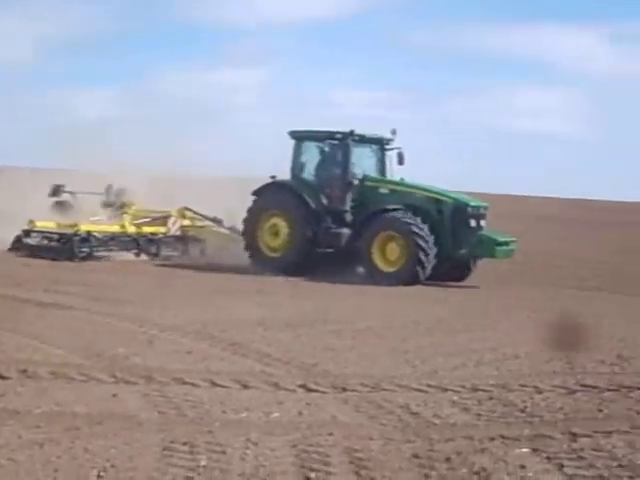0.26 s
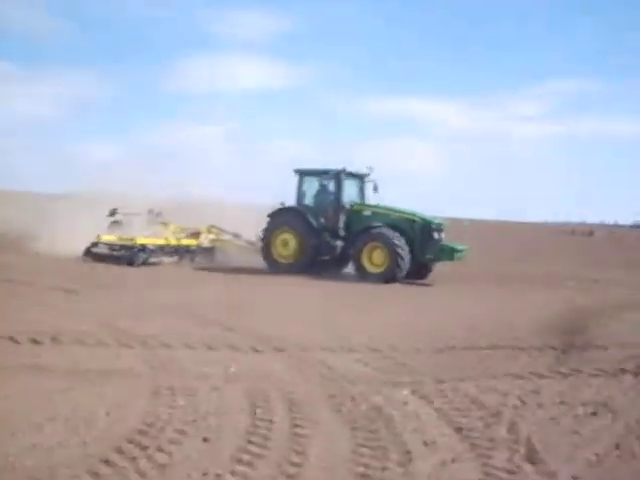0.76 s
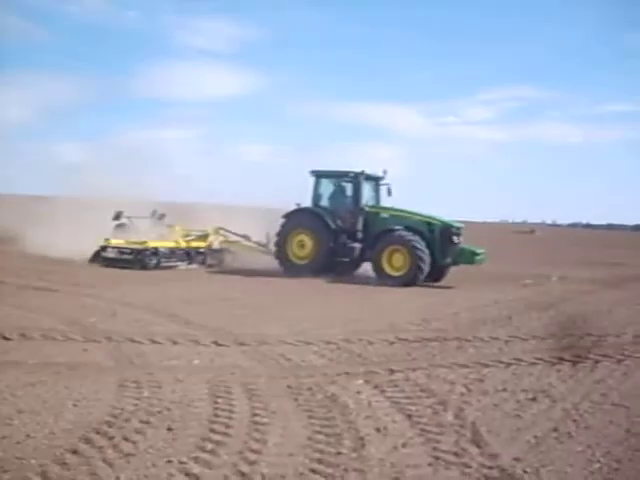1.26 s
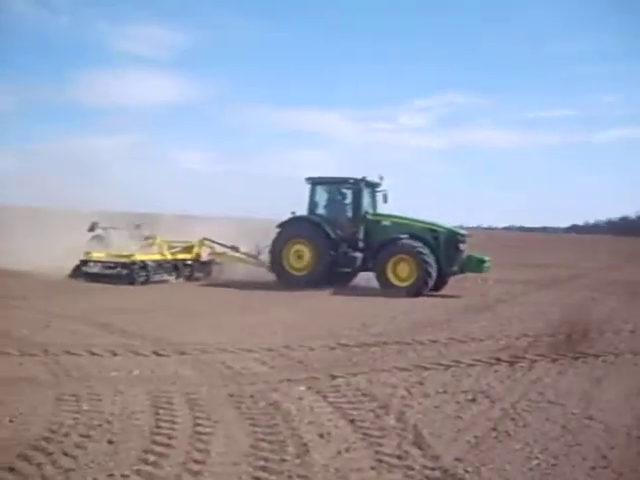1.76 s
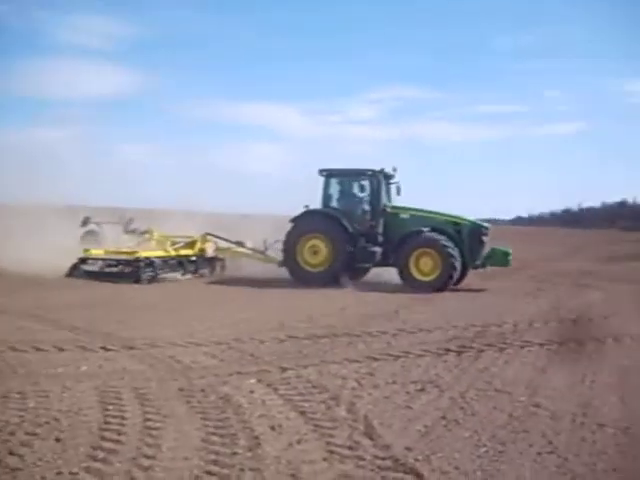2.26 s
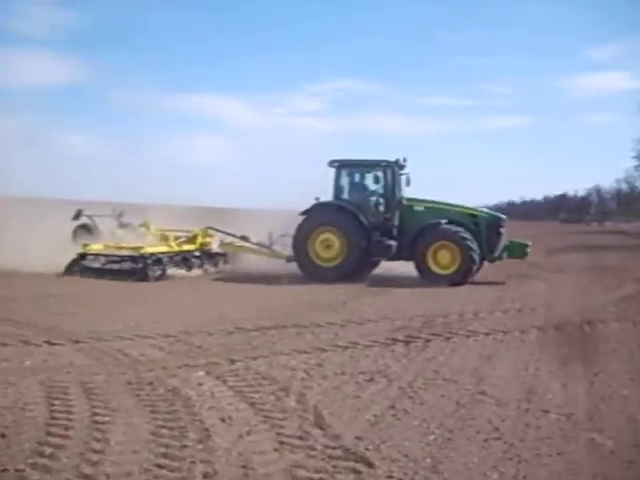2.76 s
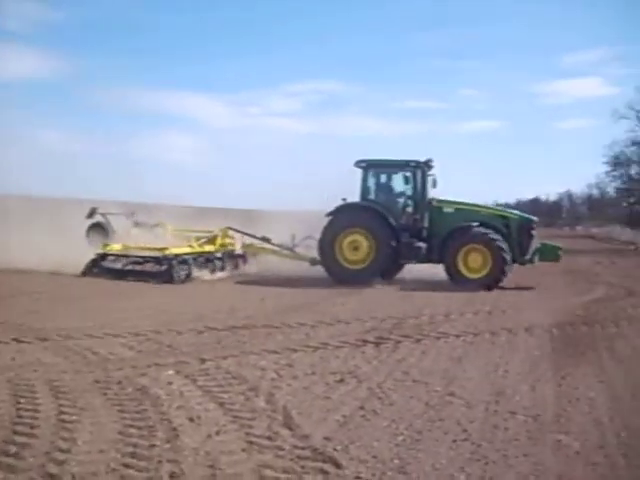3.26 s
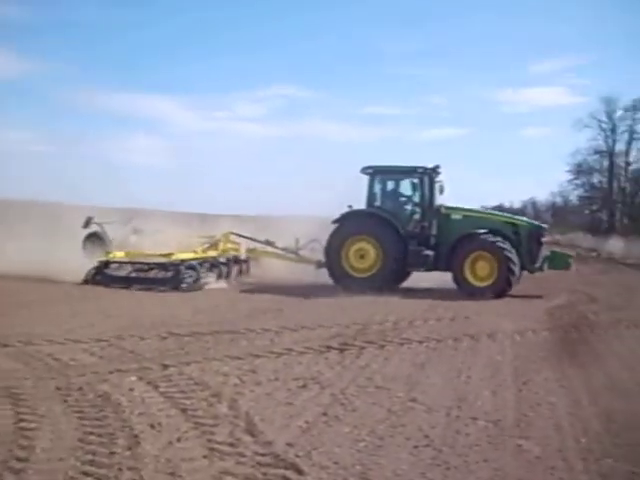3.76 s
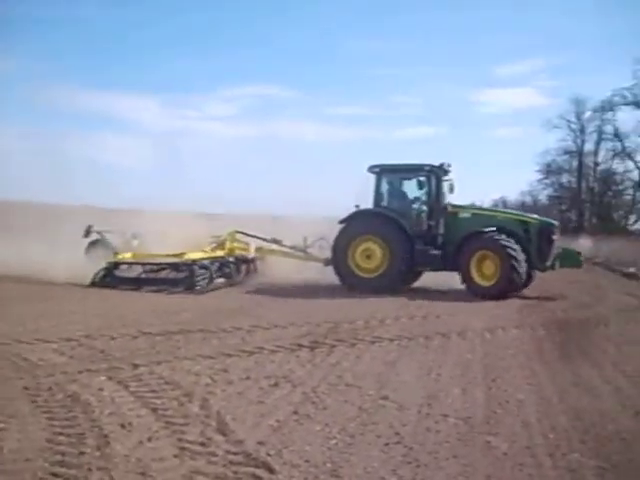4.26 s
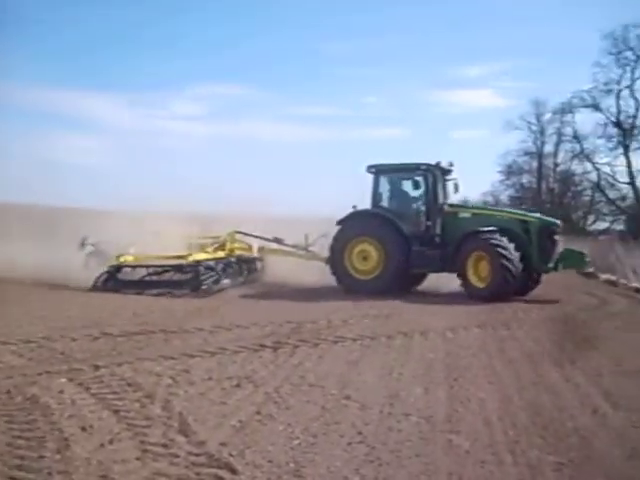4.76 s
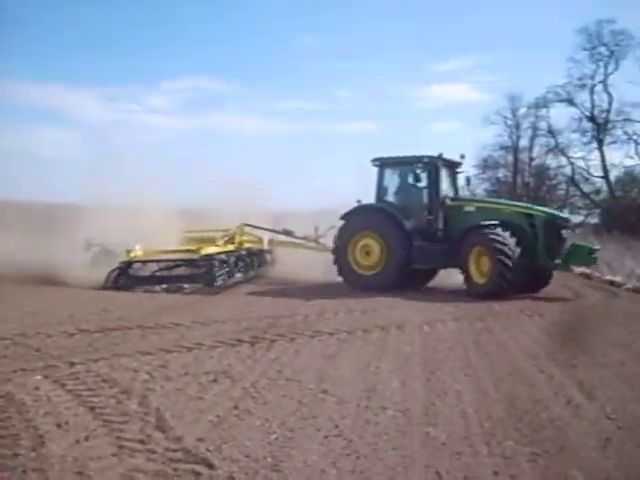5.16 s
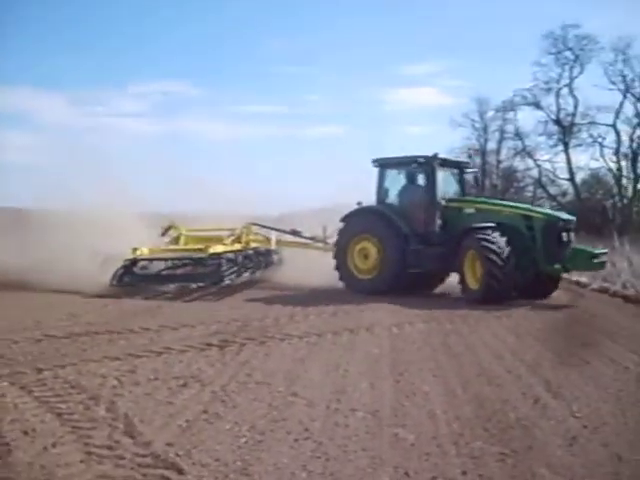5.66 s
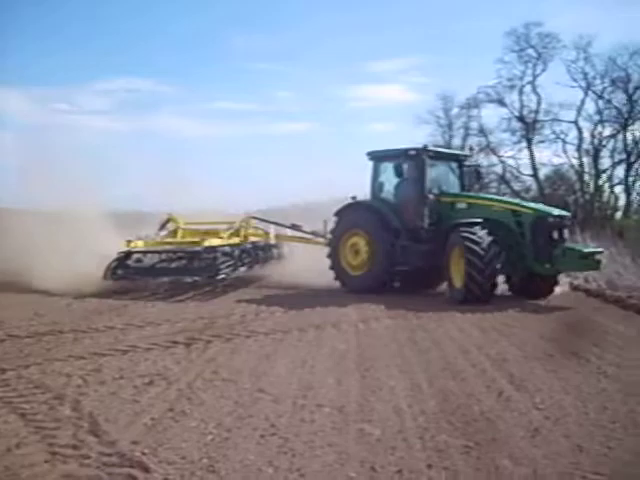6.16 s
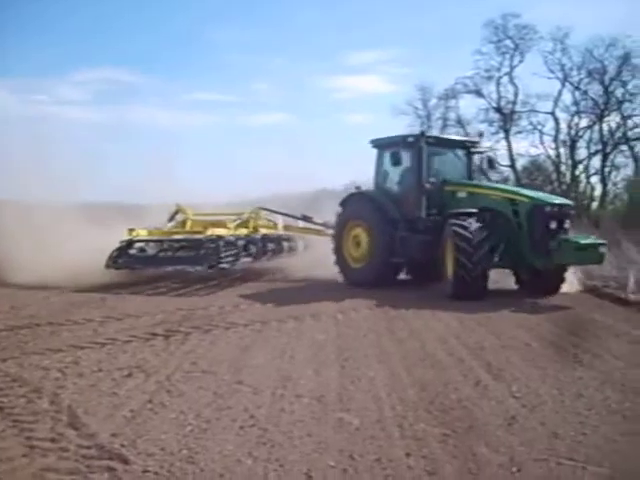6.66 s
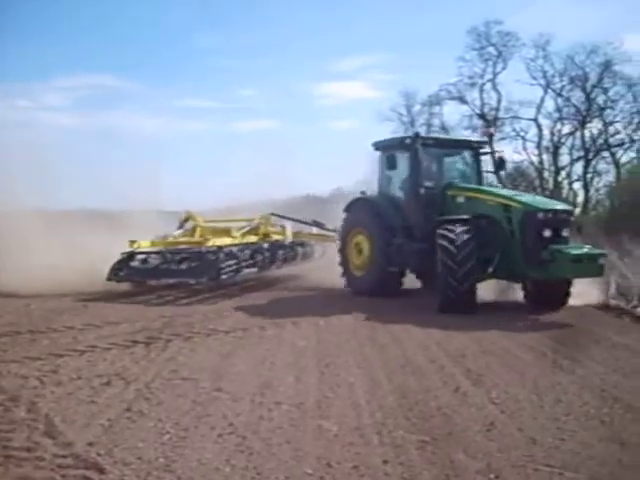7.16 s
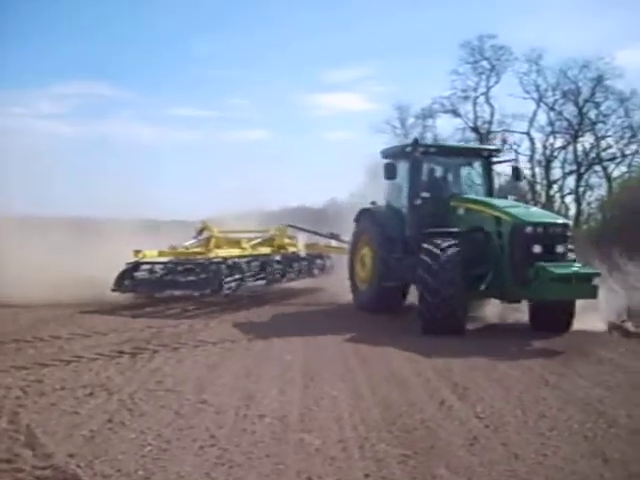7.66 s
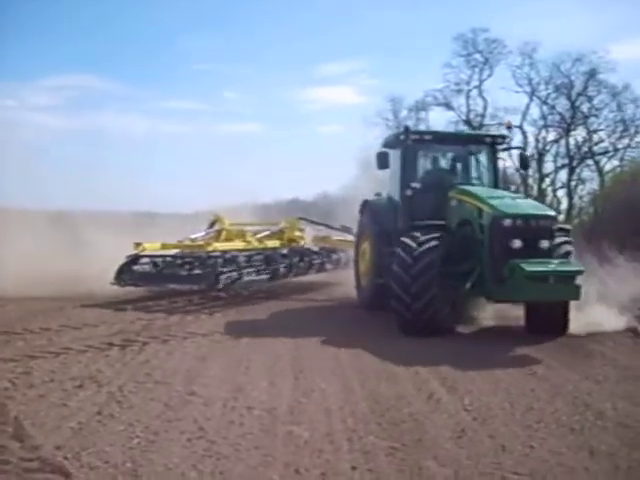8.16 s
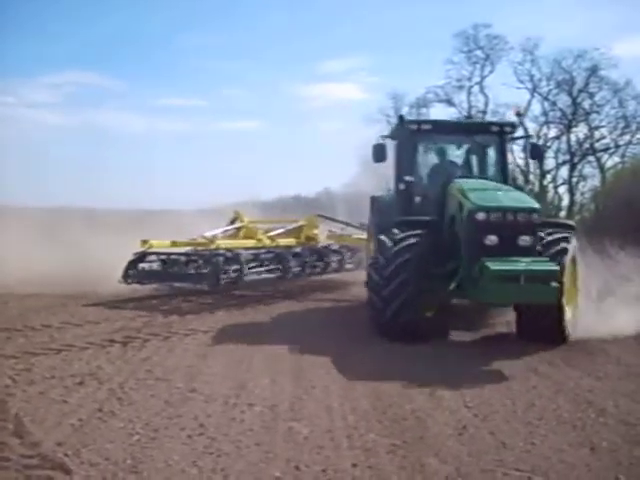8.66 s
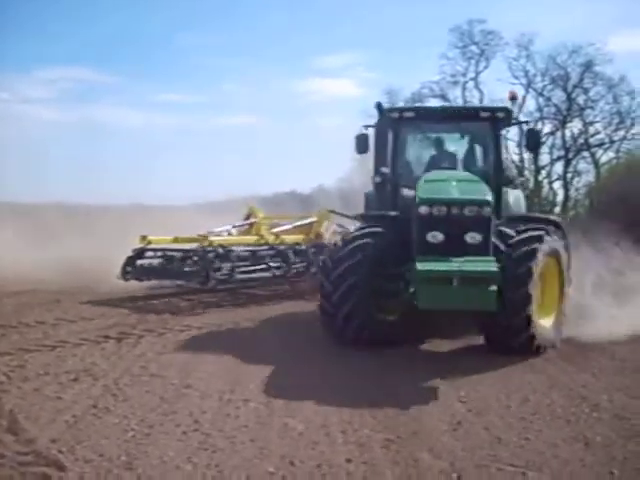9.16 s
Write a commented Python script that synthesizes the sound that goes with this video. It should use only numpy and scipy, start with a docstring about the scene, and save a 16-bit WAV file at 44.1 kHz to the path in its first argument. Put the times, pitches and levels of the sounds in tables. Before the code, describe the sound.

A tractor's clattering diesel drops from high revs to a low, approaching hum, with faint whines, metallic ticks and three sudden silences.

```python
"""A six-cylinder diesel tractor roars and clatters as it drags a cultivator over a dry field, eases off
and comes nearer. Each firing is an impulse that excites pipe, block and injectors; their noise follows
speed, load and distance, and the periodic firing gives the exhaust its harmonic note. The cooling fan
hums on a variable drive, gears and turbocharger whistle, discs sing in the soil and stones tick on the
tines over a faint breeze. The sound cuts out three times."""
import sys
import numpy as np
from scipy import signal
from scipy.fft import rfft, irfft, next_fast_len
from scipy.io import wavfile

SR = 44100
rng = np.random.default_rng(int(sys.argv[2]) if len(sys.argv) > 2 else 0)


def transcribe(signal):
    """Save signal, clipped to [-1, 1], as a 16-bit WAV file at the path in sys.argv[1]."""
    frames = np.atleast_2d(signal).T
    limited = np.clip(frames, -1, 1)
    pcm = np.round(limited * 32767).astype(np.int16)
    wavfile.write(sys.argv[1], SR, pcm)


N = 414099
TIME = np.arange(N) / SR

# spectra of the engine's five noise sources: frequency_hz, relative_level_db
PIPE_SPECTRUM = [(20, -23.5), (60, -18.5), (110, -8.5), (170, 3.5), (270, 0), (340, -4), (400, -8),
                 (520, -14), (800, -36)]
BAY_SPECTRUM = [(300, -32), (440, -12), (520, -6), (600, -1.5), (720, 1), (850, 1), (950, -1), (1050, -10),
                (1400, -32.5)]
BLOCK_SPECTRUM = [(700, -34.5), (1000, -6), (1150, -4), (1300, -3), (1480, 0), (1720, -4.5), (1920, -7.5),
                  (2250, -6), (2430, -8.5), (2660, -21.5), (2880, -12.5), (3150, -19.5), (4000, -28.5)]
INJECTOR_SPECTRUM = [(2600, -26.5), (3200, -12), (3500, -1.5), (4300, 3), (4700, 2), (5150, 1.5),
                     (5500, -4.5), (5950, -3.5), (6350, -9), (7100, -8), (8100, -9.5), (9200, -13.5),
                     (10200, -23), (11800, -39)]
GRILLE_SPECTRUM = [(1000, -22.5), (1270, -3), (1500, -3), (1740, -4), (2000, -25)]
# level laws: base_db, speed_doubling_db, full_load_db, distance_halving_db
PIPE_LAW, BAY_LAW, BLOCK_LAW = (-46, 2, 2.5, 7.5), (-38.5, 10.5, -.3, 6), (-38.5, 7.5, 2.5, 4.5)
INJECTOR_LAW, GRILLE_LAW = (-46, 5, 8, 6), (-44.5, 4, 1, 7.5)

def diesel(cycles):
    """Source and filter: one firing rhythm sounds through pipe, engine bay, block, injectors and grille."""
    rumble = firings(cycles, PIPE_SPECTRUM, PIPE_LAW, knock=.1, burst=.2, decay_s=.0098, uneven_db=2)
    roar = firings(cycles, BAY_SPECTRUM, BAY_LAW, knock=.18, burst=.12, decay_s=.01, uneven_db=-1.3)
    clatter = firings(cycles, BLOCK_SPECTRUM, BLOCK_LAW,
                      knock=.14, burst=.083, decay_s=.01, uneven_db=-.3)
    hiss = firings(cycles, INJECTOR_SPECTRUM, INJECTOR_LAW,
                   knock=.05, burst=.15, decay_s=.004, uneven_db=2.4)
    rattle = firings(cycles, GRILLE_SPECTRUM, GRILLE_LAW,
                     knock=.44, burst=.12, decay_s=.0072, uneven_db=.7)
    return rumble + roar + clatter + rattle + hiss


def firings(cycles, spectrum, law, knock, burst, decay_s, uneven_db, cylinders=6):
    """Impulse response: each cylinder rings in its own way and adds a burst to steady flow noise."""
    instants = np.flatnonzero(np.diff(np.floor(cycles)) > 0)
    age = np.arange(SR // 40) / SR
    decay = np.exp(-age / decay_s)
    knocks, bursts = np.zeros(N), np.zeros(N)
    for cylinder in range(cylinders):
        own, impulses = instants[cylinder::cylinders], np.zeros(N)
        imbalance = np.cos(2 * np.pi * cylinder / cylinders) + rng.standard_normal(len(own))
        impulses[own] = from_db(uneven_db * imbalance)
        knocks += signal.oaconvolve(impulses, decay * rng.standard_normal(len(age)))[:N]
        bursts += signal.oaconvolve(impulses, decay)[:N]
    flow = rng.standard_normal(N) * (1 - burst + burst * unit_rms(bursts))
    # knock is the share of the power that rings
    mix = np.sqrt(knock) * coloured(knocks, spectrum) + np.sqrt(1 - knock) * coloured(flow, spectrum)
    return from_db(level_db(law)) * mix


# exhaust orders: firing_multiple (rounded to the nearest half when played), level_law, flutter_db
EXHAUST_ORDERS = [(1 / 2, (-55, 14.5, -12, -3.5), 2.4), (0.92, (-54, -20, 15.5, 3.5), 0.45),
                  (3 / 2, (-60.5, 35, 1.5, 3), .4), (2, (-55.5, 18, 4, 3), 1.8), (2.4, (-69, -27.5, 14, 7),
                  2.9), (7 / 2, (-66, -9.5, 15, 13), 1.8), (4, (-72, -13, 11.5, 15.5), 1.6),
                  (8, (-48, 6.5, -12, 1.5), 6)]
# strength of the twelfth order: time_s, level_db
GROWL_LEVEL = [(2.95, -52), (3.5, -39), (3.8, -53), (5.4, -53.5), (5.9, -37), (6.5, -52), (7.2, -38),
               (7.7, -50), (9.39, -59)]

def exhaust_note(cycles):
    """Harmonic series: whole and half orders of the firing rate; phase jitter makes the twelfth growl."""
    note = sum(tone(np.round(2 * multiple) / 2 * cycles, level_db(law), flutter_db, flutter_hz=5)
               for multiple, law, flutter_db in EXHAUST_ORDERS)
    growl = tone(12 * cycles + .11 * drift(12), curve(GROWL_LEVEL), flutter_db=4, flutter_hz=16)
    return note + growl


DRONE_LAW = (-54, 19, -5, 9)
# strength of the faster gear mesh: time_s, level_db
WHINE_LEVEL = [(2.9, -69), (3.4, -48), (3.92, -54), (4.05, -40.5), (4.45, -45.5), (4.85, -48), (5.3, -44),
               (5.75, -49), (6.2, -42.5), (6.5, -70), (9.39, -61)]

def gear_whine(cycles):
    """Mesh frequency: meeting teeth make a low drone and a high whine, both rough and wavering."""
    slow, fast = 25 / 3, 100 / 3  # 25 and 100 teeth per crank turn, which is three firings
    drone_db = level_db(DRONE_LAW) + panel_db(slow * firing_hz())
    drone = tone(slow * cycles + .14 * drift(12), drone_db, flutter_db=1.4, flutter_hz=12)
    whine = tone(fast * cycles + .15 * drift(14), curve(WHINE_LEVEL), flutter_db=2.9, flutter_hz=18)
    return drone + whine


def panel_db(pitch_hz, resonance_hz=827, width_hz=82, boost_db=10):
    """Resonance: a body panel lifts a tone that sweeps across its natural frequency."""
    detuning = 2 * (pitch_hz - resonance_hz) / width_hz
    return boost_db / np.sqrt(1 + detuning ** 2)


# the fan's variable drive, geared up at low engine speed: time_s, blade_passes_per_firing
FAN_RATIO = [(3.1, 1.5197), (4.85, 2.06), (5.65, 2.36), (6.55, 2.36), (6.95, 2.3), (8.45, 2.275),
             (8.95, 2.2)]

def fan(full_strength_hz=165):
    """Blade-passing tone: a hum with a weak octave; at high revs it beats with an exhaust order."""
    ratio = curve(FAN_RATIO)
    geared_up = (ratio - ratio.min()) / np.ptp(ratio)
    blade_hz = firing_hz() * ratio
    cycles = np.cumsum(blade_hz) / SR
    octaves_below = np.maximum(np.log2(full_strength_hz / blade_hz), 0)
    hum = tone(cycles, -34.5 - 39 * octaves_below + 3 * geared_up, flutter_db=.5, flutter_hz=7)
    octave = tone(2 * cycles, -57 + 8.5 * geared_up, flutter_db=1.1, flutter_hz=8.7)
    return from_db(.5 * distance_halvings()) * (hum + octave)


TURBO_LAW = (-62.5, -2, 3.5, 1)
# the turbocharger's whistle: time_s, pitch_hz
TURBO_PITCH = [(2.2, 11040), (3.3, 7950), (3.8, 7140), (5.4, 8530), (6.3, 7760), (7.15, 8100), (7.7, 7150),
               (8.2, 6900), (9.0, 7760)]

def turbo(waver_hz=24.6, dull_above_hz=8800, loss_db_per_octave=39):
    """Rotor tone: a thin, wavering whistle follows shaft speed and is faint at its highest pitches."""
    pitch_hz = curve(TURBO_PITCH)
    cycles = np.cumsum(pitch_hz + waver_hz * drift(9)) / SR
    loss_db = loss_db_per_octave * np.maximum(np.log2(pitch_hz / dull_above_hz), 0)
    core = narrow_noise(cycles, width_hz=30)
    halo = from_db(-3.5) * narrow_noise(cycles, width_hz=200)
    return from_db(level_db(TURBO_LAW) + 3 * drift(7) - loss_db) * (core + halo)


# stones striking the tines: time_s, impulse_db
STONE_HITS = [(2.141, -20), (2.373, -20), (2.6748, -20), (3.5942, -24), (5.1724, -21), (6.2744, -17),
              (6.541, -19), (7.808, -19), (8.1392, -16), (8.373, -16), (9.208, -14), (9.3402, -15)]

def stones(grit_per_s=20, grit_db=-41.5, decay_s=.0009, steel_band_hz=(3200, 7200)):
    """Impact noise: brief contacts of stones and grit with the steel tines give bright ticks."""
    hits = (rng.random(N) < grit_per_s / SR) * from_db(grit_db + 3 * rng.standard_normal(N))
    for time_s, impulse_db in STONE_HITS:
        hits[int(time_s * SR)] += from_db(impulse_db)
    age = np.arange(SR // 50) / SR
    crack = rng.standard_normal(len(age)) * np.exp(-age / decay_s)
    steel = signal.butter(2, steel_band_hz, "band", fs=SR, output="sos")
    return signal.sosfilt(steel, signal.oaconvolve(hits, crack)[:N])


# steel discs singing in the soil: start_s, end_s, pitch_hz, level_db
DISC_TONES = [(0, .5, 5700, -44), (0, 2.4, 5120, -45), (0, 2.2, 2100, -43), (0, 2.0, 2570, -50),
              (4.0, 5, 5400, -50.5), (5.45, 6.06, 4300, -43), (8.65, 9.2, 5240, -46)]
# squeaks and clinks of the joints: centre_s, pitch_hz, length_s, level_db
JOINT_SQUEAKS = [(2.661, 7380, .06, -48), (2.675, 3200, 0.013, -42), (2.825, 6100, 0.036, -37.5),
                 (2.862, 9300, .035, -44)]

def cultivator(fade_s=.22):
    """Friction-excited vibration: discs sing as the soil rubs them, and dry joints squeak and clink."""
    out = np.zeros(N)
    for start_s, end_s, pitch_hz, db in DISC_TONES:
        rubbing = np.clip(np.minimum(TIME - start_s, end_s - TIME) / fade_s + .5, 0, 1)
        out += from_db(db) * rubbing * narrow_noise(pitch_hz * TIME, width_hz=95)
    for centre_s, pitch_hz, length_s, db in JOINT_SQUEAKS:
        out += from_db(db) * swell(centre_s, length_s) * narrow_noise(pitch_hz * TIME, width_hz=410)
    return out


# puffs of air on the microphone: centre_s, length_s, level_db
WIND_PUFFS = [(8.029, 0.044, -35), (8.449, .06, -35)]

def wind(breeze_db=-59.5):
    """Turbulent pressure: air on the microphone makes a faint rumble and soft low thumps."""
    breeze = from_db(breeze_db + 2.5 * drift(2))
    puffs = sum(from_db(db) * swell(centre_s, length_s) for centre_s, length_s, db in WIND_PUFFS)
    turbulence = coloured(rng.standard_normal(N), [(20, -.5), (50, -4.5), (90, 5), (200, -34)])
    return (breeze + puffs) * turbulence


# engine speed: time_s, firing_rate_hz
ENGINE_SPEED = [(0.0, 107.9), (2.2, 108.6), (2.55, 96.5), (2.9, 85.0), (3.2, 74.1), (3.45, 67.1),
                (3.75, 73.7), (4.05, 65.3), (4.2, 65.0), (4.75, 68.8), (5.15, 70.6), (5.32, 72.8),
                (5.5, 73.3), (5.75, 72.1), (6.15, 68.4), (6.95, 71.7), (7.25, 75.5), (7.6, 70.2),
                (8.0, 68.4), (8.95, 76.1), (9.39, 76.3)]

def firing_hz():
    """Firing frequency: the rate to which the engine's orders are locked."""
    return curve(ENGINE_SPEED)


# how hard the engine pulls: time_s, load_fraction
ENGINE_LOAD = [(0, 0.9), (1.5, 0.61), (2.2, 0.83), (3.05, 0.14), (3.55, 0.6), (3.9, 0.35), (4.3, 0.9),
               (5.15, 0.76), (5.6, 0.32), (6.4, 0.32), (7.0, 0.43), (7.5, 0.07), (7.9, 0.17), (8.45, 0.61),
               (9.05, .55), (9.39, 0.13)]

def level_db(law, cruise_hz=72):
    """Gains add in decibels: a base level plus terms for speed, load and nearness."""
    base_db, speed_db, load_db, near_db = law
    octaves = np.log2(firing_hz() / cruise_hz)
    return base_db + speed_db * octaves + load_db * curve(ENGINE_LOAD) + near_db * distance_halvings()


# the tractor's approach: time_s, distance_m
TRACTOR_PATH = [(0, 38.7), (2.3, 37.3), (4.0, 33.9), (5.2, 25.1), (6.5, 17.8), (7.3, 15.4), (8.0, 15.2),
                (9.39, 12.1)]

def distance_halvings(reference_m=30):
    """Geometric spreading: level changes by a set step each time the distance halves."""
    return np.log2(reference_m / curve(TRACTOR_PATH))


def tone(cycles, db, flutter_db, flutter_hz):
    """Amplitude modulation: a partial of the given rms level flutters in the moving air."""
    return np.sqrt(2) * np.sin(2 * np.pi * cycles) * from_db(db + flutter_db * drift(flutter_hz))


def narrow_noise(cycles, width_hz):
    """Random quadrature modulation spreads a pitch into a narrow band of noise; rms 1."""
    return drift(width_hz) * np.cos(2 * np.pi * cycles) + drift(width_hz) * np.sin(2 * np.pi * cycles)


def coloured(x, spectrum):
    """Linear filtering gives a flat signal the spectrum of a body; rms 1."""
    size = next_fast_len(N)
    hz, db = np.transpose(spectrum)
    bins_hz = np.maximum(np.fft.rfftfreq(size, 1 / SR), 1)
    gain = from_db(np.interp(np.log(bins_hz), np.log(hz), db, left=-90, right=-90))
    return unit_rms(irfft(rfft(x, size) * gain, size)[:N])


def drift(rate_hz):
    """Low-passed noise wanders with a spread of 1, about rate_hz times a second."""
    hop, settle = 40, 2000
    pole = np.exp(-2 * np.pi * rate_hz * hop / SR)
    noise = rng.standard_normal(N // hop + settle + 2)
    slow = signal.lfilter([1], [1, -2 * pole, pole * pole], noise)[settle:]
    return np.interp(np.arange(N) / hop, np.arange(len(slow)), unit_rms(slow))


def swell(centre_s, length_s):
    """Gaussian envelope: a brief rise and fall."""
    return np.exp(-np.minimum((2 * (TIME - centre_s) / length_s) ** 2, 20))


def curve(rows):
    """Linear interpolation of (time_s, value) rows at every sample."""
    return np.interp(TIME, *np.transpose(rows))


def from_db(db):
    """Decibels to amplitude ratio."""
    return 10 ** (np.asarray(db) / 20)


def unit_rms(x):
    """Normalisation to unit power."""
    return x / np.sqrt(np.mean(x ** 2) + 1e-20)


def scene():
    """Superposition in a free field, with no echo; the fan starts in opposite phase to the exhaust."""
    cycles = np.cumsum(firing_hz()) / SR  # one cycle per firing
    tractor = diesel(cycles) + exhaust_note(cycles) + gear_whine(cycles) - fan() + turbo()
    return (tractor + stones() + cultivator() + wind())[None]


# gaps in the sound: start_s, end_s
SILENCES = [(.4223, 1.1882), (4.6415, 4.7414), (5.3449, 5.4414)]

def record(dry, cutoff_hz=11900):
    """Gating and band limiting: the sound drops out abruptly three times and the top treble is cut."""
    gate = np.ones(N)
    for start_s, end_s in SILENCES:
        gate[int(start_s * SR):int(end_s * SR)] = 0
    low_pass = signal.ellip(10, .1, 90, cutoff_hz, fs=SR, output="sos")
    return signal.sosfilt(low_pass, dry * gate + 1e-18)


dry = scene()
out = record(dry)
transcribe(out)
```